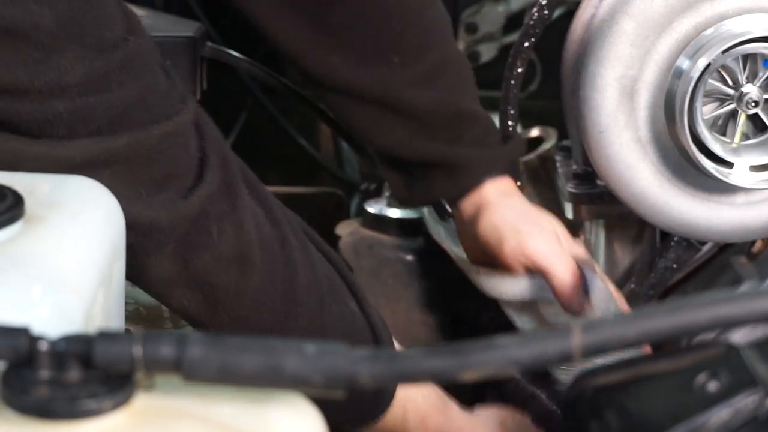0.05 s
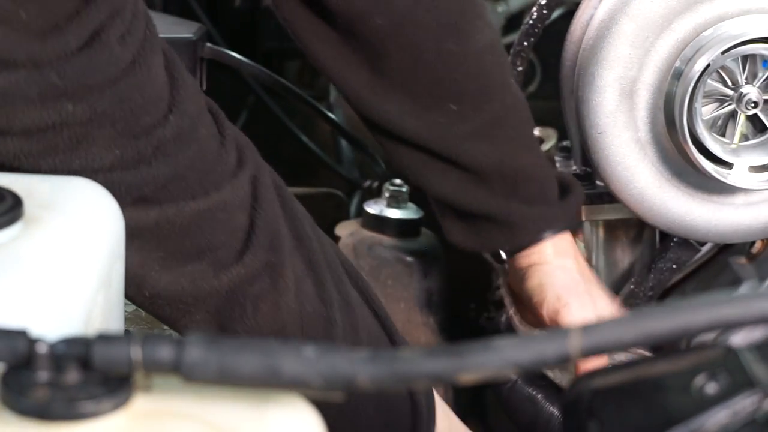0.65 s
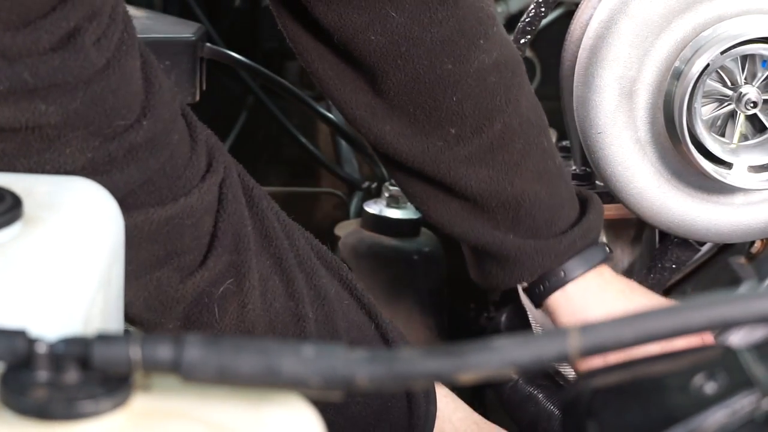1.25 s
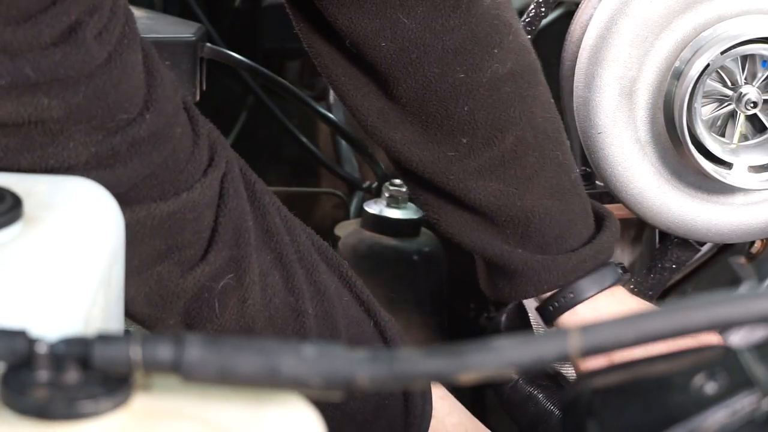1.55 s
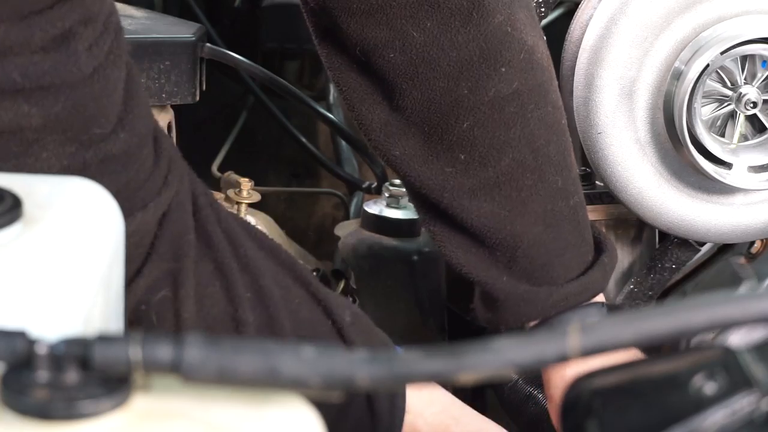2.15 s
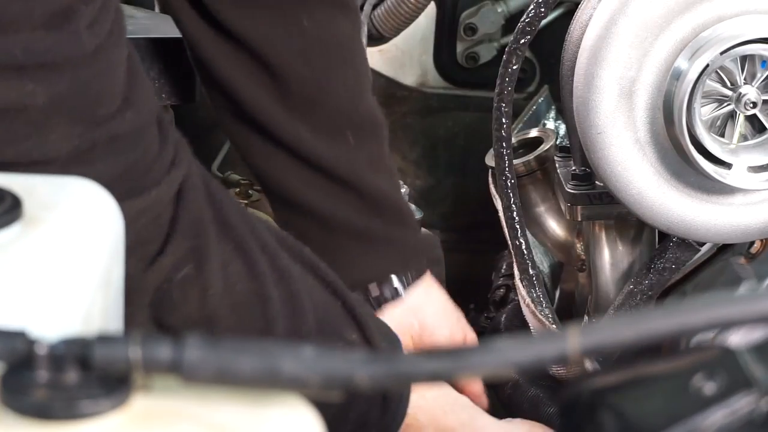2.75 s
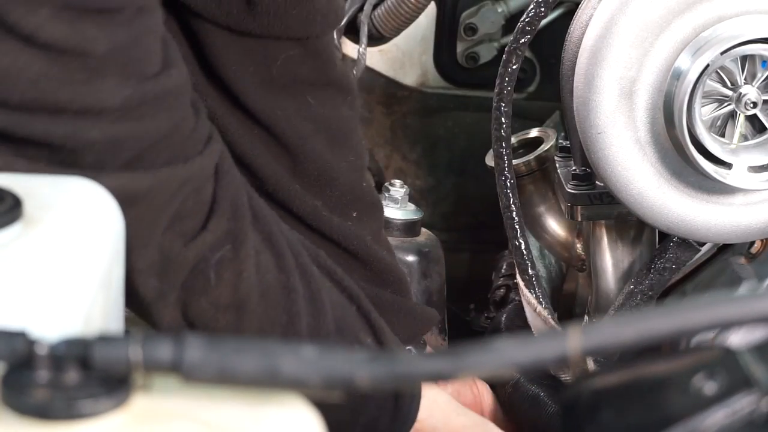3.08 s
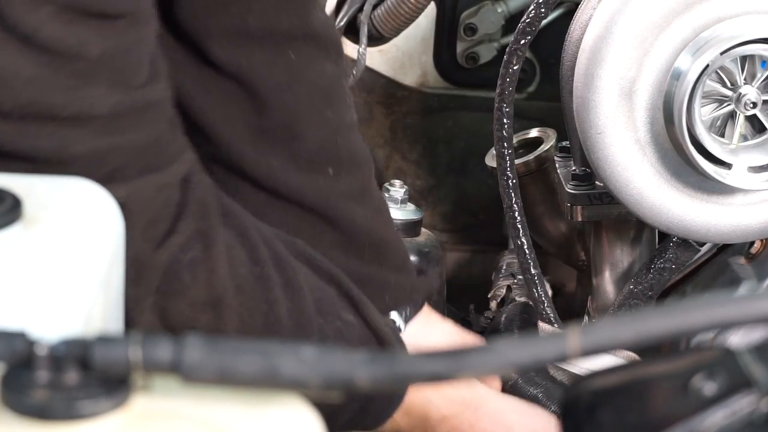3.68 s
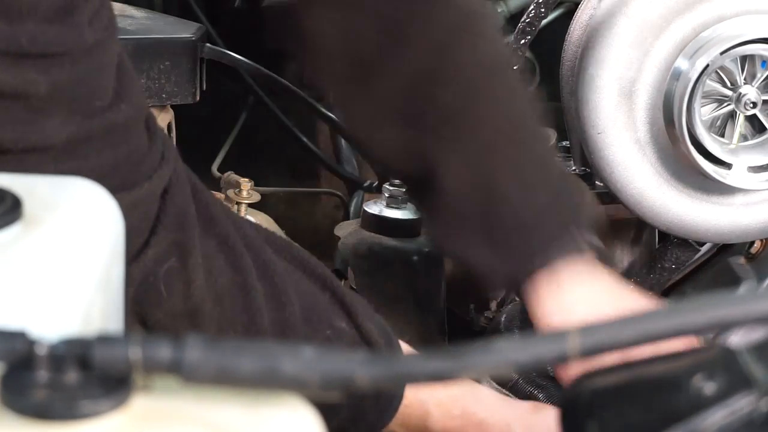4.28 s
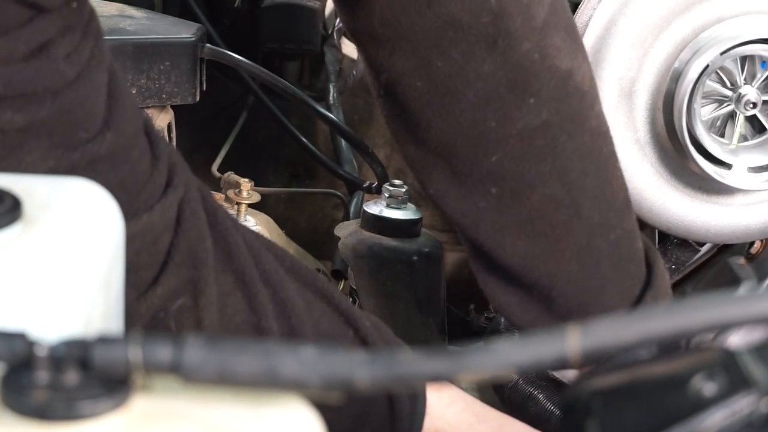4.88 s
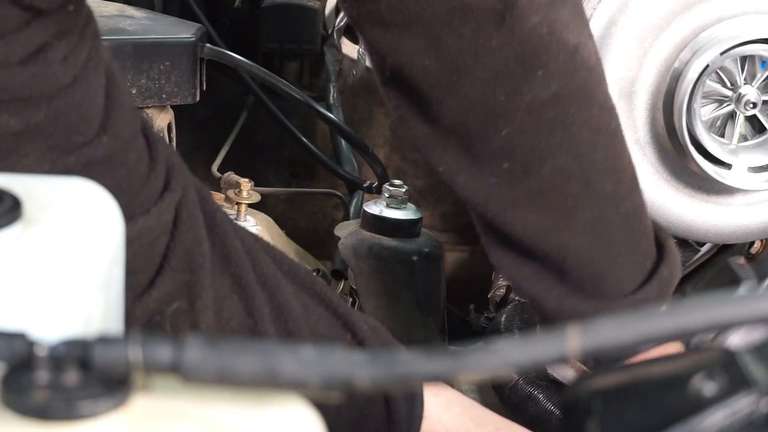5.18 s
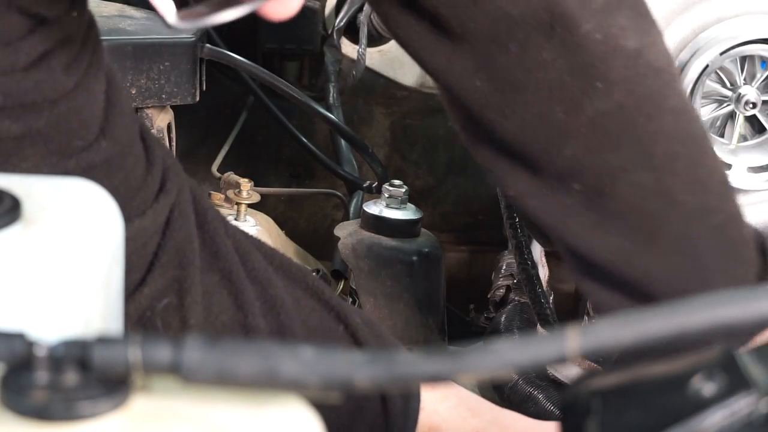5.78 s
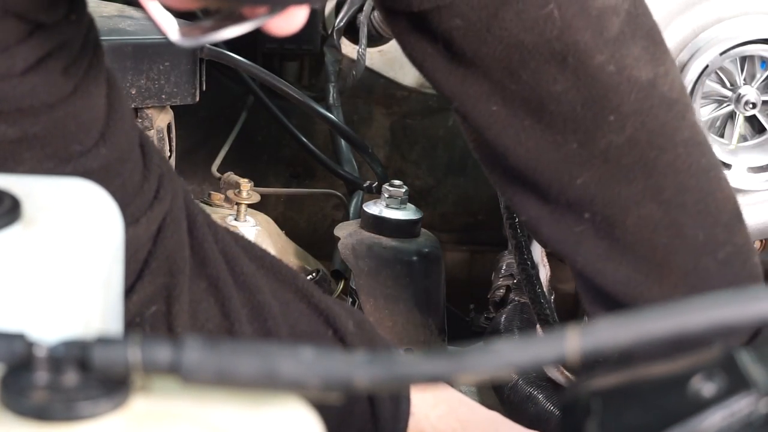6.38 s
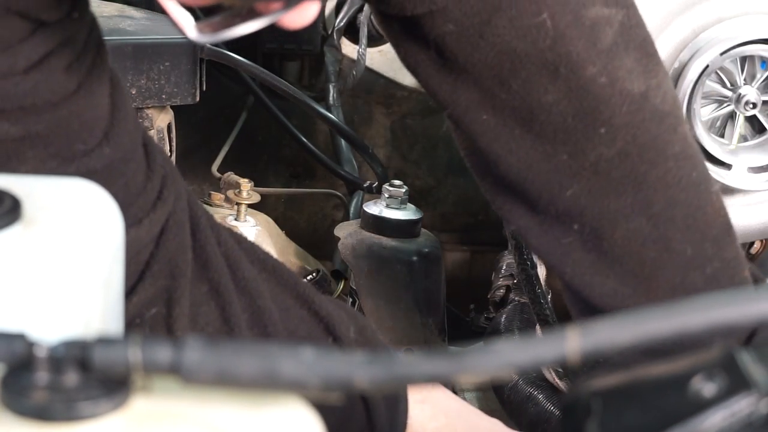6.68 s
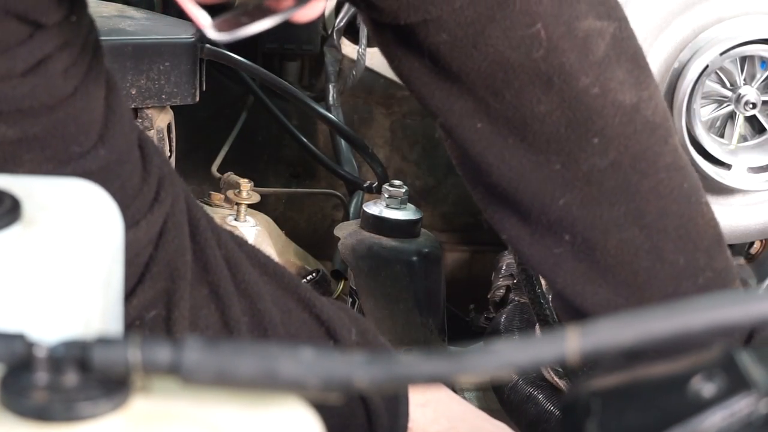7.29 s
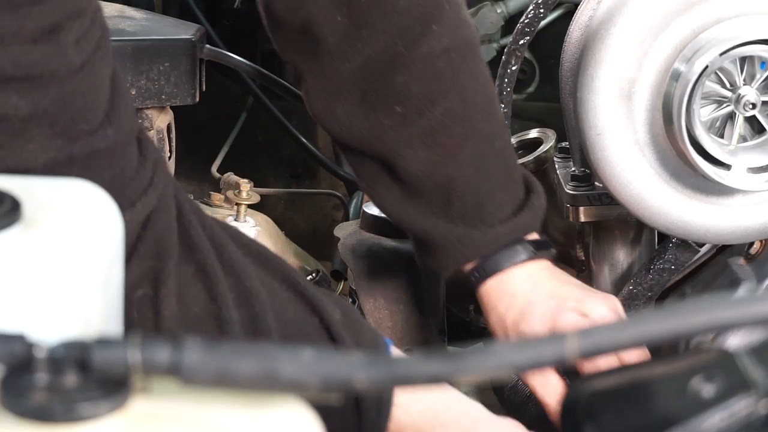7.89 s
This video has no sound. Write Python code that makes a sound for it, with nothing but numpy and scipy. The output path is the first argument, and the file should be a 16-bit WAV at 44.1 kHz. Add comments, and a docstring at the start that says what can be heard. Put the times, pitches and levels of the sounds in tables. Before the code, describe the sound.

Close, quiet handling of a foil sleeve on an engine pipe: uneven rustles, dull squeezes of padding and small bumps on a hollow part. One much louder thump with a brief rattle interrupts early on. Short hook-and-loop rips follow, then lighter crinkling and scattered sharp ticks. Clothing rubs over hoses and skin drags on them with faint squeaks, above a low rumble and soft workshop room tone.

```python
"""Workshop, deep in the engine bay of a parked car: hands wrap a foil-faced insulating sleeve round a pipe.
The sleeve scrapes in tiny slips, foil creases flip, and its hook-and-loop strip snaps and rips in short
pulls. Hands press the padding, arms rub hoses, dragging skin makes them sing. Bumps ring a hollow part,
once with a loud, rattling thump. Low rumble, room tone and faint hiss lie underneath."""
import sys
import numpy as np
from scipy import signal
from scipy.fft import rfft, irfft, next_fast_len
from scipy.io import wavfile
from scipy.ndimage import map_coordinates

SR = 44100
rng = np.random.default_rng(int(sys.argv[2]) if len(sys.argv) > 2 else 0)


def output_pcm(signal):
    """Save a mono or channel-first signal as 16-bit PCM at the path in sys.argv[1].

    Samples are clipped to [-1, 1] before scaling.
    """
    pcm = np.clip(np.atleast_2d(signal).T, -1, 1) * 32767
    wavfile.write(sys.argv[1], SR, np.round(pcm).astype(np.int16))


N = 350154
TIME_S = np.arange(N) / SR

# unbroken light contact of the moving arms: t/s, level/dB
LIGHT_CONTACT = [(0, -58.5), (1.2, -66.5), (1.75, -62), (2.28, -67.5), (2.8, -63.5), (3.2, -69.5),
                 (3.42, -66), (3.7, -62.5), (4.6, -63), (4.88, -66), (5.02, -69.5), (5.15, -67), (5.9, -66),
                 (6.4, -69.5), (6.9, -65), (7.08, -72), (7.3, -70), (7.94, -65.5)]
# sleeve over pipe: t/s, length/s, level/dB, fizz offset/dB
SLEEVE_SLIDES = [(0, .56, -54, -1.5), (0.108, 0.046, -64, 11.5), (0.304, 0.048, -50, -18),
                 (0.65, 0.08, -56.5, -1), (0.74, 0.133, -48.5, -2), (0.956, 0.098, -55.5, 2.5),
                 (1.101, 0.074, -54, 3), (1.256, 0.29, -59.5, -5), (1.375, 0.087, -51, -4),
                 (1.473, 0.036, -47.5, -14), (1.586, 0.09, -54, 4), (1.823, 0.066, -53.5, -8),
                 (1.912, 0.12, -56, -7), (2.068, 0.094, -59.5, 0), (2.147, 0.096, -62.5, 1),
                 (2.355, 0.043, -54, 4.5), (2.467, 0.096, -58.5, -3), (3.007, 0.11, -60.5, -2),
                 (3.464, 0.21, -53.5, -12), (3.67, 0.16, -65, -1), (3.956, 0.074, -61, -15),
                 (4.214, 0.17, -61, -4), (4.603, 0.14, -58.5, -8), (4.733, .095, -56, -4),
                 (5.064, 0.164, -60.5, -2), (5.225, 0.043, -56, 8.5), (5.31, 0.16, -58, 1),
                 (5.53, 0.039, -54.5, -2), (5.927, 0.16, -65, 3), (5.99, 0.046, -66, 24.5),
                 (6.165, .06, -61, 3), (6.584, .15, -65, 1), (7.186, 0.19, -69, -0.5),
                 (7.462, 0.098, -59.5, -2), (7.727, 0.051, -55, 6), (7.775, 0.17, -62.5, 4.5)]
# creases against smooth sliding: t/s, power share/1
CREASE_SHARE = [(0, 0), (1.9, 0.38), (4.6, 0), (5.0, 0.47), (7.9, 0.35)]
# hands into padding: t/s, length/s, level/dB
HAND_PRESSES = [(.035, 0.062, -38), (.1, 0.15, -50), (.24, 0.16, -38), (.41, 0.13, -44), (.72, 0.19, -41.5),
                (.96, 0.1, -45.5), (1.23, 0.33, -43), (1.5, 0.44, -52), (1.82, 0.15, -47),
                (2.35, 0.057, -46), (2.7, 0.33, -44), (2.97, 0.086, -34.5), (3.14, 0.15, -44.5),
                (3.28, 0.12, -48), (3.48, 0.19, -35), (3.79, 0.06, -39), (3.93, 0.2, -42),
                (4.59, 0.25, -42), (5.3, 0.17, -55), (5.63, 0.16, -48), (5.86, 0.27, -61), (6.53, .25, -70),
                (7.72, 0.06, -43), (7.89, 0.073, -43.5)]
# knocks on parts round the pipe: t/s, peak/dB, high-pass f/Hz, ring time factor/1
PART_BUMPS = [(0.057, -39, 70, 0.62), (.451, -36, 336, 0.5), (0.713, -35.5, 400, 0.69),
              (0.839, -40, 250, 0.21), (1.850, -35, 650, 1), (1.8615, -25.5, 420, 0.094),
              (1.9176, -30, 380, 0.26), (2.6255, -6, 40, 1), (3.010, -38, 344, 0.64),
              (3.133, -35.5, 397, 1), (3.494, -32.5, 370, 0.4), (3.508, -27.5, 403, 0.3),
              (4.253, -38, 246, 0.75), (4.785, -34.5, 190, 0.98), (5.703, -36, 417, 0.44)]
# modes of the hollow part: f/Hz, level/dB, t60/s
PART_MODES = [(68, -30, 0.57), (121, -19, .25), (145.5, -15.5, 0.47), (168, 6.5, 0.028),
              (215.5, -13.5, 0.17), (279, -13, 0.16), (322, -4, 0.078), (343.6, 1, 0.073), (354, -2, 0.054),
              (431, -18.5, .16), (462, -3.5, 0.027), (582, -13, 0.077), (669, -16.5, 0.073),
              (790, -23.5, 0.13), (887, -19, 0.077)]
# single hooks and foil creases: t/s, crack/dB, body/dB
SLEEVE_SNAPS = [(0.111, -33.5, -67), (0.133, -31.5, -67), (0.1453, -42, -42), (0.4514, -47, -43),
                (0.7121, -56, -37), (0.773, -42, -43), (0.838, -43, -49), (1.4865, -35, -42.5),
                (1.643, -36, -64), (1.837, -32, -49), (1.849, -52, -44), (1.862, -43, -41),
                (1.9237, -23.5, -45), (1.9566, -33, -52), (2.017, -37, -52), (2.3056, -40, -57),
                (2.367, -41, -64), (2.4577, -38.5, -61), (3.0099, -51, -32.5), (3.029, -47, -34.5),
                (3.0617, -38, -63), (3.0804, -38, -63), (3.488, -36, -44), (3.5095, -44, -37),
                (3.5293, -45, -36), (3.6032, -39, -62), (4.657, -27.5, -54), (4.6642, -25.5, -47),
                (4.6762, -31, -64), (4.686, -42, -60), (4.7293, -35.5, -58), (5.2375, -36, -55),
                (5.247, -39, -62), (5.2665, -33, -50), (5.444, -34, -50.5), (5.687, -34, -50),
                (5.766, -36.5, -73), (6.1523, -33, -41), (6.171, -37.5, -59), (6.184, -41, -64),
                (6.2012, -30.5, -42.5), (6.2117, -39, -58), (6.2404, -43, -54), (6.35, -35, -57),
                (6.5193, -38.5, -51), (6.5999, -30.5, -45.5), (6.6257, -33, -48), (6.65, -36, -52),
                (6.706, -33.5, -49), (6.814, -35.5, -55), (6.91, -41, -67), (7.0024, -30, -50),
                (7.399, -34, -48), (7.5047, -38, -53), (7.7365, -31, -54), (7.761, -41, -68),
                (7.7895, -37, -55), (7.909, -33.5, -50.5)]
# forearms over hoses and covers: t/s, length/s, level/dB, rasp offset/dB
ARM_RUBS = [(0.15, 0.31, -44.5, -2.5), (0.647, 0.29, -52.5, 2.5), (0.924, 0.18, -58, -2),
            (1.235, 0.43, -47.5, -1.5), (1.547, 0.3, -52, -11), (1.934, 0.27, -54, -20),
            (2.361, 0.055, -47, -2), (2.453, 0.37, -57, 1), (2.677, 0.66, -51, -4.5),
            (3.422, 0.34, -45.5, -4), (3.702, 0.58, -48, -2.5), (4.153, 0.6, -52, -11),
            (4.6, 0.26, -53.5, 2.5), (5.3, 0.19, -52, -4), (5.562, 0.22, -62.5, 3),
            (5.988, 0.035, -49.5, 11), (6.145, 0.15, -61, 11), (6.58, 0.16, -51.5, -2.5),
            (6.787, 0.056, -61, 6), (7.453, 0.23, -58.5, 4), (7.583, 0.49, -54.5, -3.5)]
# skin on hose: t/s, length/s, start f/Hz, end f/Hz, level/dB, groan re tone/dB
SKIN_DRAGS = [(0.237, 0.17, 457, 509, -48, -19), (1.284, 0.26, 736, 798, -55.5, 10),
              (1.437, 0.22, 740, 830, -55, -7), (3.929, 0.22, 706.5, 755, -48.5, 2),
              (4.012, 0.14, 2770, 2970, -64, -20), (4.118, 0.11, 800, 749, -52, -13),
              (4.204, .5, 1886, 1790, -68, -4), (7.506, 0.055, 688, 720, -51.5, -23),
              (7.543, 0.018, 710, 716, -43, -20), (7.505, 0.061, 1320, 1325, -58.5, -25),
              (7.543, 0.11, 365, 390, -58, -25), (7.73, 0.11, 990, 930, -69, 12)]
# strip rips, a scuff, the thump's rattle: t/s, rise/s, length/s, crackle/dB, body/dB, low-pass f/Hz
CRACKLE_BURSTS = [(0.704, 0.0049, 0.066, -49.5, -51.5, 4340), (1.343, .002, .016, -50.5, -46.5, 6000),
                  (1.932, 0.019, 0.026, -48, -49.5, 13900), (2.621, 0.012, 0.049, -45, -42, 4200),
                  (2.915, 0.046, 0.065, -53.5, -50, 4500), (3.014, .019, 0.041, -47.5, -55, 15000),
                  (3.533, 0.013, 0.065, -46.5, -48.5, 15000), (3.548, 0.064, 0.081, -45.5, -47.5, 12600),
                  (5.984, 0.013, 0.081, -48, -51.5, 15000), (6.988, 0.025, 0.02, -41, -48, 13800)]
# low rumble: t/s, level/dB
RUMBLE_LEVEL = [(0, -51.5), (1.1, -55.5), (2.2, -56), (2.9, -53.5), (4.4, -50.5), (4.55, -56.5), (5.7, -59),
                (7.3, -57.5), (7.6, -53), (7.73, -48), (7.84, -41), (7.9, -55)]
# workshop decay: f/Hz, t60/s
WORKSHOP_T60 = [(100, 0.59), (1500, 0.18), (15000, 0.073)]

# spectra: f/Hz, relative density/dB
SCRAPE_EQ = [(900, -24), (1800, -1), (2700, -3.5), (3400, 0), (4200, .5), (6400, -2.5), (7400, -10.5),
             (8500, -16), (13000, -47)]  # sleeve on pipe
FIZZ_EQ = [(4000, -59), (6500, -9.5), (7400, 3.5), (10500, 4.5), (13400, 3.5), (16000, 0)]  # its fine treble
CRACK_EQ = [(300, -19), (1200, -21), (2000, -5), (2700, -3.5), (3700, 2), (7000, 0.5), (10000, -6),
            (13000, -2), (16000, -3.5)]  # one hook or crease
PADDING_EQ = [(40, -29), (80, -1), (135, 0.5), (220, -5), (330, -4), (470, -3.5), (620, -18), (900, -21.5),
              (2500, -50)]  # pressed insulation
HOSE_EQ = [(250, 0), (480, -0.5), (620, 8), (760, 0.5), (880, -2.5), (1050, -45), (2000, -68)]  # hollow tone of a rubbed hose
RASP_EQ = [(600, -23.5), (950, -1.5), (1340, -2), (1520, -1.5), (1750, -5), (2050, -7), (2700, -13.5),
           (5000, -26)]  # cloth on hose
CAVITY_EQ = [(200, -20), (650, 1), (1000, 1), (1380, -.5), (1780, -2), (2150, -5.5), (2700, -16),
             (3400, -16), (6000, -50)]  # padded air space under the sleeve
CRACKLE_EQ = [(150, -40), (1200, -7), (1700, -5.5), (2650, -8), (3600, 0), (6200, -2), (7400, -2.5),
              (10500, -4.5), (13400, -2), (16000, -3)]  # rip, scuff or rattle
RUMBLE_EQ = [(3, 7.5), (10, 5.5), (22, -7), (45, -0.5), (75, -9), (110, -17), (250, -48)]
ROOM_TONE_EQ = [(30, 5), (130, -10), (220, -23), (400, -19), (1700, -33), (2500, -37), (16000, -37)]
HISS_EQ = [(150, 5), (1500, -3.0), (5000, 8), (10000, 15.5)]


def amp(db):
    """Decibels to gain."""
    return 10 ** (np.asarray(db) / 20)


def unit(x):
    """Scale to rms 1."""
    return x / np.sqrt(np.mean(x ** 2) + 1e-20)


def at_hz(points, hz):
    """Interpolate over log frequency."""
    f_hz, value = np.transpose(points)
    return np.interp(np.log(hz + 1), np.log(f_hz + 1), value)


def follow(curve):
    """Control curve at every sample."""
    return np.interp(TIME_S, *np.transpose(curve))


def add(mix, start_s, sound):
    """Mix in at start_s."""
    part = mix[max(round(start_s * SR), 0):][:len(sound)]
    part += sound[:len(part)]


def colour(x, eq):
    """Filter by a spectrum; white noise keeps its power."""
    size = next_fast_len(len(x) + 2048)
    gain = unit(amp(at_hz(eq, np.fft.rfftfreq(size, 1 / SR))))
    return irfft(rfft(x, size) * gain, size)[:len(x)]


def grains(per_s, spread_db, clump_db, clump_s, smooth):
    """Friction: clumps of uneven slips over smooth noise."""
    size = amp(spread_db * np.minimum(rng.exponential(1, N), 4))
    slips = unit(size * rng.choice([-1, 1], N) * (rng.random(N) < per_s / SR))
    knots = rng.standard_normal(8000)
    clumps = np.interp(TIME_S / clump_s, np.arange(len(knots)), knots)
    return unit((slips + smooth * rng.standard_normal(N)) * amp(clump_db * clumps))


def bursts(per_s, spread_db, cap, decay_s):
    """Sparse flips, each a decaying noise burst."""
    flips = amp(spread_db * np.minimum(rng.exponential(1, N), cap)) * (rng.random(N) < per_s / SR)
    envelope = signal.lfilter([1], [1, -np.exp(-1 / (decay_s * SR))], flips)
    return envelope * rng.standard_normal(N)


def held(t, length_s, attack_s=0.0078, release_s=0.017, growth_db=3):
    """Slide force: quick grip, slow growth, quick stop."""
    edges = np.clip(np.minimum(t / attack_s, (length_s - t) / release_s), 0, 1)
    return edges * amp(growth_db * (t / length_s - 1))


def arch(t, length_s, peak_at=0.57, steepness=0.72):
    """Press or rub force: swells, eases off."""
    phase = np.interp(t / length_s, [0, peak_at, 1], [0, .5, 1])
    return abs(np.sin(np.pi * phase)) ** steepness


def strokes(rows, shape, contact_db, **form):
    """Gain curve: strokes and light contact, summed in power."""
    power = amp(follow(LIGHT_CONTACT) + contact_db) ** 2
    for start_s, length_s, db in rows:
        force = shape(np.arange(0, length_s, 1 / SR), length_s, **form)
        add(power, start_s, (amp(db) * force) ** 2)
    return np.sqrt(power)


def drift(x, depth_db=2.0, patch_hz=1300, patch_s=0.1):
    """Moving contact patch: broad random peaks come and go."""
    hz, frame_s, spectrum = signal.stft(x, SR, nperseg=512)
    grid = np.meshgrid(hz / patch_hz, frame_s / patch_s, indexing="ij")
    patches = map_coordinates(rng.standard_normal((64, 256)), grid, order=1, mode="wrap")
    return signal.istft(spectrum * amp(depth_db * patches), SR, nperseg=512)[1][:N]


def hand_echo(x, gap_m=0.0872, travel=0.465, move_s=.12, echo_gain=0.19):
    """Reflection off the moving hand: a wandering comb filter."""
    wander = np.interp(TIME_S / move_s, np.arange(400), rng.standard_normal(400))
    delay_s = 2 * gap_m * np.exp(travel * wander) / 343
    hz, frame_s, spectrum = signal.stft(x, SR, nperseg=512)
    bounce = echo_gain * np.exp(-2j * np.pi * hz[:, None] * np.interp(frame_s, TIME_S, delay_s))
    return unit(signal.istft(spectrum * (1 + bounce), SR, nperseg=512)[1][:N])


def slides():
    """Cloth and foil scrape the pipe: dense slips, sparse creases when squeezed."""
    scrape = strokes([row[:3] for row in SLEEVE_SLIDES], held, contact_db=0)
    fizz_rows = [(start_s, length_s, db + fizz_db) for start_s, length_s, db, fizz_db in SLEEVE_SLIDES]
    fizz = strokes(fizz_rows, held, contact_db=-1.5)
    slips = grains(per_s=2200, spread_db=4.2, clump_db=1.6, clump_s=.006, smooth=1.3)
    creases = unit(bursts(per_s=160, spread_db=3.3, cap=3.5, decay_s=0.0033))
    share = follow(CREASE_SHARE)
    rustle = np.sqrt(1 - share) * slips + np.sqrt(share) * creases
    rustle = hand_echo(drift(rustle))
    return amp(-1.5) * scrape * colour(rustle, SCRAPE_EQ) + amp(-3.5) * fizz * colour(rustle, FIZZ_EQ)


def ticks():
    """Stray hooks and tiny creases tick under light contact."""
    flips = bursts(per_s=20, spread_db=4.0, cap=2, decay_s=0.00091)
    return amp(follow(LIGHT_CONTACT) + 7) * colour(flips, CRACK_EQ)


def presses():
    """Dull slips inside the pressed padding."""
    force = strokes(HAND_PRESSES, arch, contact_db=10)
    slips = grains(per_s=600, spread_db=4.0, clump_db=4.0, clump_s=0.018, smooth=0.53)
    return amp(-4.5) * force * colour(slips, PADDING_EQ)


def bumps(push_hz=600, tap_gain=0.41):
    """Push and rebound ring a hollow part; a resting hand shortens the ring, leaving a dull tap."""
    out = np.zeros(N)
    t = np.arange(int(.4 * SR)) / SR
    phase = 2 * np.pi * push_hz * np.arange(1024) / SR
    push = phase * (2 - phase) * np.exp(-phase)
    for start_s, db, low_hz, ring_factor in PART_BUMPS:
        ring = np.zeros(len(t))
        for k, (hz, mode_db, t60_s) in enumerate(PART_MODES):
            decay = np.exp(-np.log(1000) * t / (t60_s * ring_factor))
            ring += (-1) ** k * amp(mode_db) * decay * np.sin(2 * np.pi * hz * t)
        thump = signal.fftconvolve(push, ring)
        thump = signal.lfilter(*signal.butter(2, low_hz, "high", fs=SR), thump)
        thump /= abs(thump).max()
        add(thump, 0, tap_gain * (1 - ring_factor) * push / push.max())
        add(out, start_s, amp(db) * thump / abs(thump).max())
    return out


def snaps(rise_s=0.0001, crack_s=0.0017, body_s=0.0036, tint_db=1.5):
    """A hook or crease lets go: sharp crack, dry knock in the air under the sleeve."""
    t = np.arange(2048) / SR
    rise = 1 - np.exp(-t / rise_s)
    cracks, bodies = np.zeros(N), np.zeros(N)
    for start_s, crack_db, body_db in SLEEVE_SNAPS:
        tint_eq = np.column_stack([np.geomspace(800, 16000, num=10), tint_db * rng.standard_normal(10)])
        crack, knock = (colour(rng.standard_normal(len(t)), tint_eq) * rise for _ in range(2))
        add(cracks, start_s + 0.00045, amp(crack_db - 5.5) * crack * np.exp(-t / crack_s))
        add(bodies, start_s + 0.00053, amp(body_db + 4) * knock * np.exp(-t / body_s))
    return colour(cracks, CRACK_EQ) + colour(bodies, CAVITY_EQ)


def rubs():
    """Cloth on the forearms drags over hoses: hollow tone plus rasp."""
    hollow = strokes([row[:3] for row in ARM_RUBS], arch, contact_db=5.5, peak_at=0.5)
    rasp_rows = [(start_s, length_s, db + rasp_db) for start_s, length_s, db, rasp_db in ARM_RUBS]
    rasp = strokes(rasp_rows, arch, contact_db=8, peak_at=0.5)
    slips = grains(per_s=900, spread_db=0, clump_db=3.0, clump_s=.01, smooth=0.96)
    return amp(-5) * hollow * colour(slips, HOSE_EQ) + amp(-7) * rasp * colour(slips, RASP_EQ)


def drags(tone_width_hz=40, groan_width_hz=14, groan_ratio=.16, overtone_db=-7):
    """Stick-slip of skin rings a hose: narrow tone and low groan glide as the arm moves."""
    out = np.zeros(N)
    for start_s, length_s, start_hz, end_hz, db, groan_db in SKIN_DRAGS:
        count = int(length_s * SR)
        cycles = np.cumsum(np.linspace(start_hz, end_hz, count)) / SR
        partials = [(1, tone_width_hz, 0), (groan_ratio, groan_width_hz, groan_db),
                    (2 * groan_ratio, 2 * groan_width_hz, groan_db + overtone_db)]
        for ratio, width_hz, partial_db in partials:
            slips = rng.standard_normal(SR) + 1j * rng.standard_normal(SR)
            waver = signal.sosfilt(signal.butter(2, width_hz, fs=SR, output="sos"), slips)[-count:]
            tone = unit((waver * np.exp(2j * np.pi * ratio * cycles)).real)
            add(out, start_s, amp(db + partial_db) * tone * signal.windows.tukey(count, .7))
    return out


def crackles():
    """Short crackling bursts with a hollow body: strip rips, a scuff and the thump's rattle."""
    clicks = grains(per_s=1800, spread_db=3, clump_db=2, clump_s=.002, smooth=.6)
    crackle, body = colour(clicks, CRACKLE_EQ), colour(clicks, CAVITY_EQ)
    out = np.zeros(N)
    for start_s, rise_s, length_s, crackle_db, body_db, top_hz in CRACKLE_BURSTS:
        t = np.arange(int(length_s * SR)) / SR
        fall_s = max(length_s - rise_s, 1 / SR)
        swell = np.minimum(t / rise_s, (length_s - t) / fall_s)
        span = int(start_s * SR) + np.arange(len(t))
        dulled = signal.lfilter(*signal.butter(2, top_hz, fs=SR), crackle[span])
        add(out, start_s, swell * (amp(crackle_db) * unit(dulled) + amp(body_db) * unit(body[span])))
    return out


def reflections(x, bay_db=-9, bay_decay_s=0.0038, tail_db=-23):
    """Quick engine bay echoes, then the faint workshop tail."""
    t = np.arange(SR // 2) / SR
    taps = rng.choice([-1, 1], len(t)) * (rng.random(len(t)) < 2500 / SR) * (t > .002)
    bay = taps * np.exp(-t / bay_decay_s)
    bay = signal.lfilter(*signal.butter(2, 700, "high", fs=SR), bay)  # small parts reflect short waves
    hz, frame_s, spectrum = signal.stft(taps * (t > .015), SR, nperseg=256)
    decay = np.exp(-np.log(1000) * frame_s / at_hz(WORKSHOP_T60, hz)[:, None])
    tail = signal.istft(spectrum * decay, SR, nperseg=256)[1][:len(t)]
    echoes = amp(bay_db) * bay / np.linalg.norm(bay) + amp(tail_db) * tail / np.linalg.norm(tail)
    return x + signal.oaconvolve(x, echoes)[:N]


def scene():
    """Mono work and background; hiss in antiphase left and right."""
    rumble = amp(follow(RUMBLE_LEVEL) + 2) * colour(rng.standard_normal(N), RUMBLE_EQ)
    room_tone = amp(-65) * colour(rng.standard_normal(N), ROOM_TONE_EQ)
    work = reflections(slides() + presses() + rubs() + snaps() + ticks() + crackles() + bumps() + drags())
    hiss = amp(-74) * colour(rng.standard_normal(N), HISS_EQ)
    return work + rumble + room_tone + np.array([hiss, -hiss])


def record(dry, edge_hz=15950):
    """Steep low-pass band limit."""
    lowpass = signal.firwin(511, edge_hz, window=("kaiser", 9), fs=SR)
    return signal.oaconvolve(dry, lowpass[None], "same", axes=1)


dry = scene()
out = record(dry)
output_pcm(out)
```